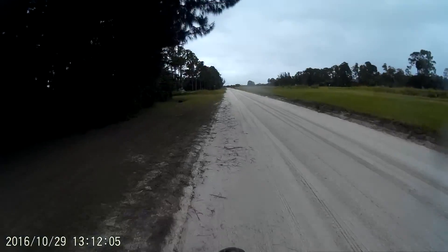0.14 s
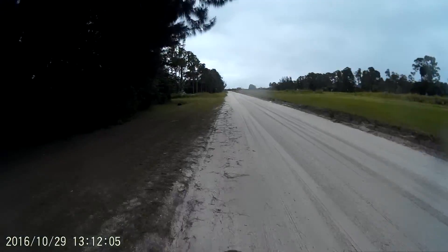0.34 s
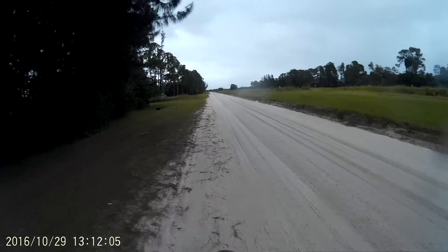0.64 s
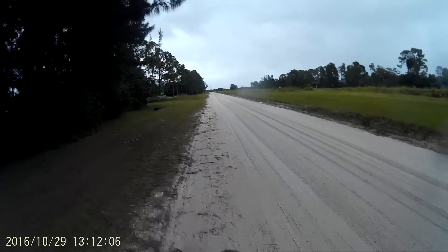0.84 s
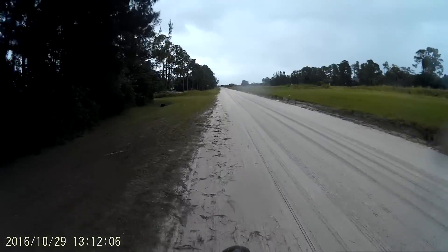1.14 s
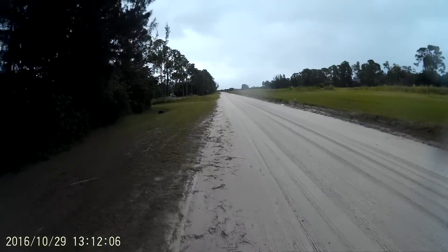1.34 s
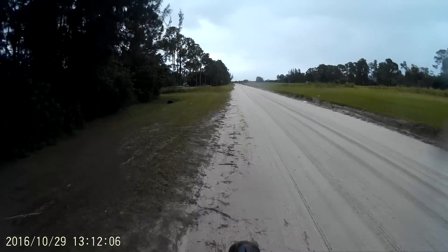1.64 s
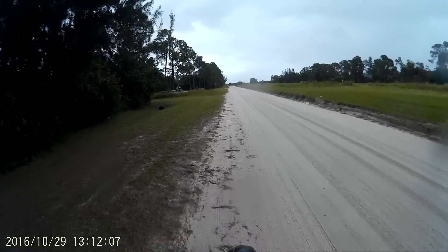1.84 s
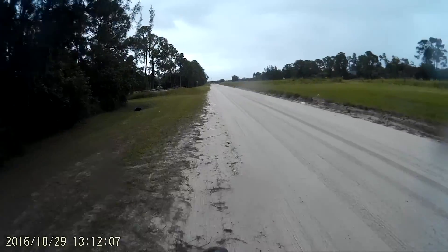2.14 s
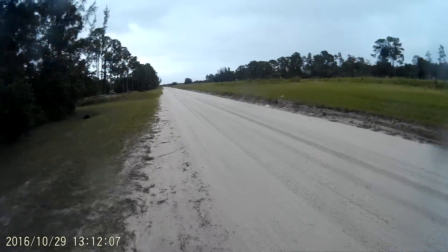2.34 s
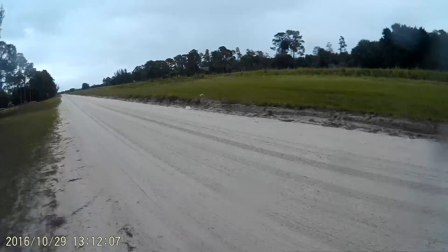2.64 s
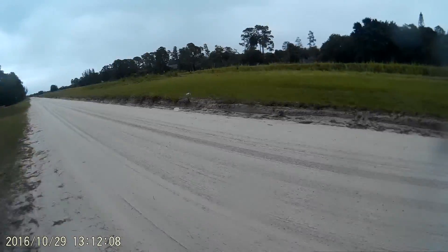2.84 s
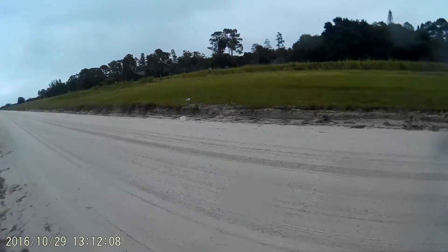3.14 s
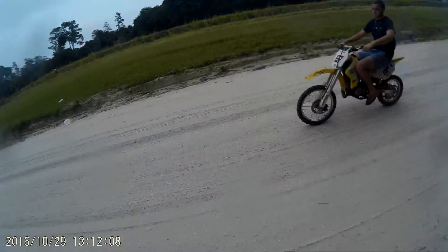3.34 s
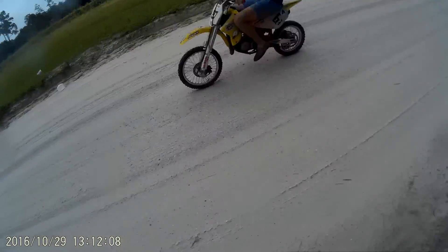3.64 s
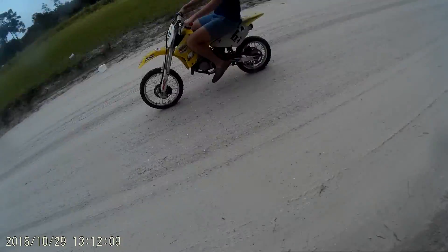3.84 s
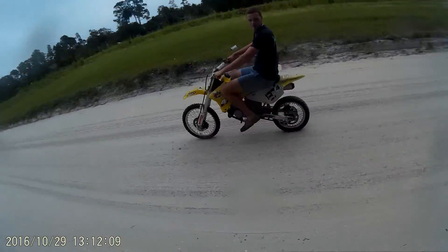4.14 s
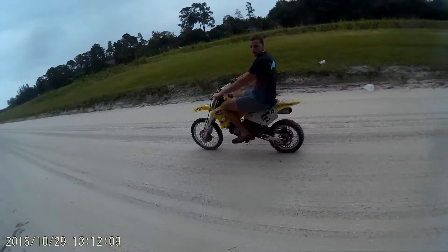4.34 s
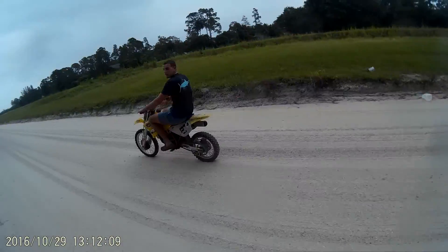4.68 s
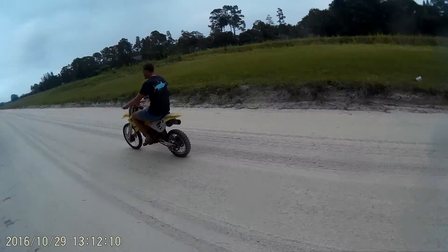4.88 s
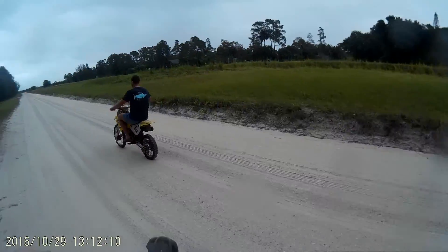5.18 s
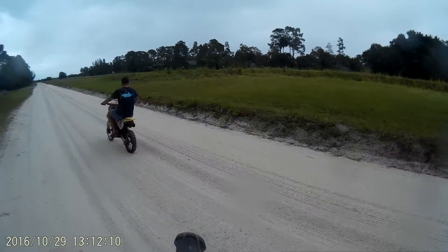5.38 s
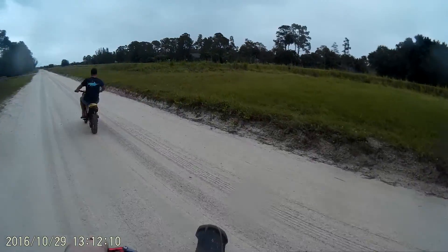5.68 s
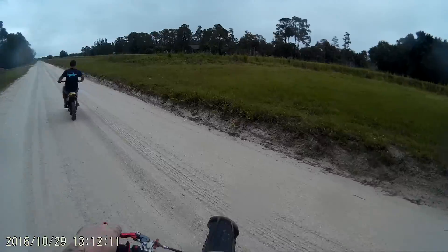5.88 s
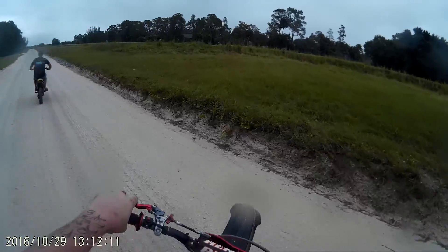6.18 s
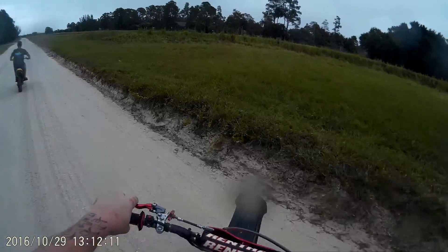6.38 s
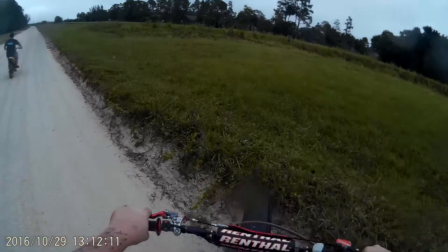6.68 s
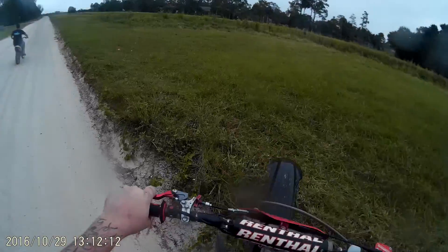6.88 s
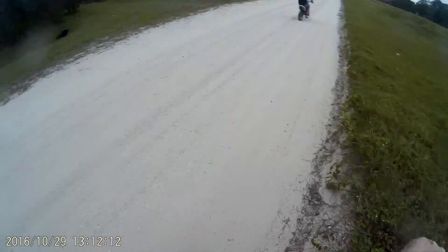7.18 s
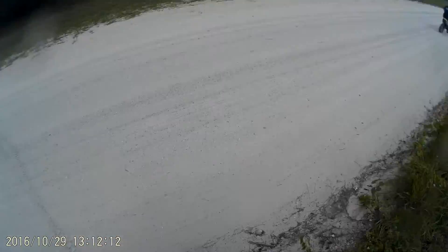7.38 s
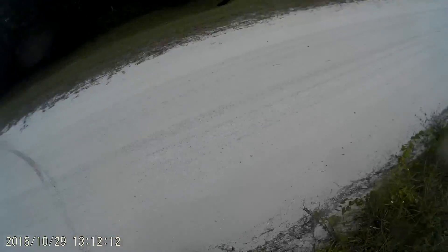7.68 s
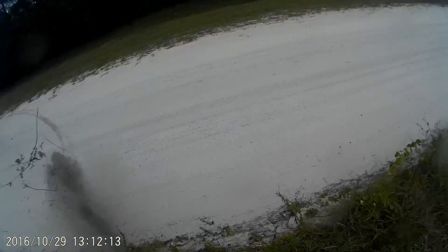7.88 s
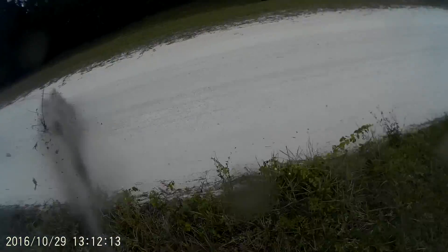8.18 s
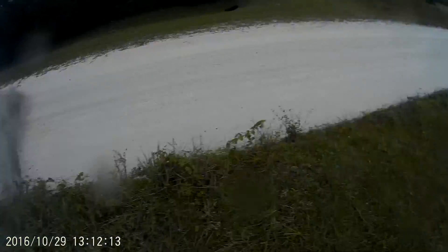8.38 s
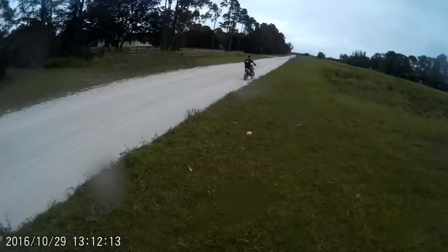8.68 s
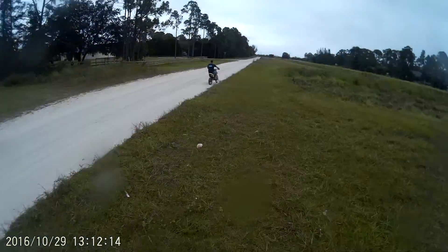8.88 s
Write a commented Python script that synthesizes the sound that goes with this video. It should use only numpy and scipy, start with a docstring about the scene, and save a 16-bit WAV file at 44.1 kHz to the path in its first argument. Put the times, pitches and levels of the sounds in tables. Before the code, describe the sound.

A two-stroke dirt bike coasts along a sandy track, heard from the rider's helmet. The engine throbs low, with metallic clatter, a ringing exhaust pipe and scattered sharp bangs. A smaller bike putters past and fades away. The bangs then come in quick runs as the throttle is blipped with a hollow honk, leading to one short, loud bark of full throttle, a brief coast and more revving.

```python
"""A sandy track, heard from the helmet of a rider on a two-stroke dirt bike. The engine coasts: the pipe
throbs, piston and chain clatter, the steel expansion chamber rings. Single firings bang in the pipe,
each resetting the crank's speed before it runs down again. A smaller bike putters past and away.
Throttle blips make the air box honk, and one burst of full throttle fires on every turn."""
import sys
import numpy as np
from scipy import signal
from scipy.fft import rfft, irfft
from scipy.io import wavfile
from scipy.ndimage import uniform_filter1d

SR = 44100
rng = np.random.default_rng(int(sys.argv[2]) if len(sys.argv) > 2 else 0)


def write(x):
    x = np.atleast_2d(x).T
    wavfile.write(sys.argv[1], SR, np.round(np.clip(x, -1, 1) * 32767).astype(np.int16))


N = 397782
TIME = np.arange(N) / SR
SIZE = 8192  # samples in a filter or wavetable
FREQ = np.arange(SIZE // 2 + 1) * SR / SIZE


def undb(db):
    """Decibels to gain."""
    return 10 ** (np.asarray(db) / 20)


def unit(x):
    """Scale to rms 1."""
    return x / np.sqrt(np.mean(x ** 2))


def lookup(x, table):
    """Read a two-column breakpoint curve at x."""
    return np.interp(x, *np.transpose(table))


def curves(table):
    """Each column after the time as an automation curve, one value per sample."""
    times, *columns = np.transpose(table)
    return [np.interp(TIME, times, column) for column in columns]


def gate(start, end, fade_s):
    """1 between start and end, 0 outside, with soft edges."""
    return np.clip(np.minimum(TIME - start, end - TIME) / fade_s + .5, 0, 1)


def noise():
    """White noise."""
    return rng.standard_normal(N)


def drift(rate_hz):
    """Smooth random drift of rms 1."""
    hold = int(SR / rate_hz)
    steps = np.repeat(rng.standard_normal(N // hold + 1), hold)
    return unit(uniform_filter1d(steps, hold)[:N])


def highpass(hz, order=4):
    """High-pass gain in dB."""
    return -10 * np.log10(1 + (hz / (FREQ + 10)) ** (2 * order))


def lowpass(hz, order=2):
    """Low-pass gain in dB."""
    return -10 * np.log10(1 + (FREQ / hz) ** (2 * order))


def eq(points):
    """Gain in dB through (f/Hz, level/dB) points, falling steeply below the first."""
    hz, db = np.transpose(points)
    return np.interp(np.log(FREQ + 1), np.log(hz), db) + highpass(hz[0] / 2)


def bells(modes):
    """Gain in dB of peaks and notches given as (f/Hz, width/Hz, gain/dB)."""
    return sum(db / (1 + (2 * (FREQ - hz) / width) ** 2) for hz, width, db in modes)


def ring(x, db):
    """Minimum-phase filter of this shape and unit power: peaks ring after each blow."""
    cepstrum = irfft(np.log(unit(undb(db)) + 1e-6))
    cepstrum[1:SIZE // 2] *= 2
    cepstrum[SIZE // 2 + 1:] = 0
    return signal.oaconvolve(x, irfft(np.exp(rfft(cepstrum))))[:N]


def scatter(x, spread_s, step_hz, lead=512):
    """Many paths through the machine: each frequency arrives with its own delay."""
    delay = np.interp(FREQ / step_hz, np.arange(SIZE), rng.random(SIZE) ** 2) * spread_s
    response = irfft(np.exp(-2j * np.pi * np.cumsum(delay) * SR / SIZE))
    return signal.oaconvolve(x, np.roll(response, lead)[:SIZE // 2])[lead:N + lead]


def clicks(times, sizes):
    """Impulses placed between samples by a short windowed sinc."""
    at = np.asarray(times)[:, None] * SR
    index = at.astype(int) + np.arange(-7, 9)
    taps = np.sinc(index - at) * np.sinc((index - at) / 8) * np.asarray(sizes)[:, None]
    return np.bincount(np.clip(index, 0, N).ravel(), taps.ravel(), N + 1)[:N]


def puffs(times, sizes, decay_s, tail_db, tail_s):
    """A noise burst with a weaker tail at each time; a size of 1 has unit energy."""
    t = TIME[:SR // 3]
    decay = np.exp(-2 * t / decay_s) + undb(2 * tail_db) * np.exp(-2 * t / tail_s)
    triggers = clicks(np.round(times * SR) / SR, sizes ** 2)
    power = signal.fftconvolve(triggers, decay / decay.sum())[:N]
    return noise() * np.sqrt(np.abs(power))


def strokes(turns, jitter_s, spread_db):
    """Time and size of one blow per turn; sizes keep the mean power near 1."""
    times = np.interp(np.arange(1, int(turns[-1])), turns, TIME)
    chance = rng.standard_normal((1000, 2))[:len(times)]
    sizes = np.sqrt(np.gradient(times) * SR) * undb(spread_db * chance[:, 1])
    return times + jitter_s * chance[:, 0], sizes


def by_speed(hz, cruise_db, db_per_octave, cruise_hz=45):
    """Level in dB of a part that grows louder with crank speed."""
    return cruise_db + db_per_octave * np.log2(hz / cruise_hz)


# the throb peaks near the pipe's lowest resonance: crank f/Hz, level/dB
THROB_LEVEL = [(32, -43.5), (43, -37.5), (55, -30), (70, -27.5), (82, -30), (100, -36), (120, -34)]
# fader rides as the helmet moves about the bike: t/s, throb gain/dB, chamber gain/dB
HELMET_RIDES = [(0, -1, -6), (.35, -7, 1.5), (.6, -6, -17), (1.1, -1, -4), (2.3, -3.5, -4.5),
                (3.15, 3.5, 5), (3.85, -3, 3.5), (4.15, 6, 9), (4.8, 1, -6), (5.3, 0, 3), (6.1, -1, 3.5),
                (6.48, 3.5, 1.5), (6.68, -8, -3.5), (7.35, -4.5, 4.5), (7.95, -9.5, 0), (8.25, 2, -5),
                (8.7, -6, -9), (9, 1, 6.5)]


def throb(turns, hz):
    """Air pumped once a turn: an almost pure low tone over a little rumble."""
    tone = np.sqrt(2) * np.sin(2 * np.pi * turns)
    rumble_eq = eq([(20, -2), (60, -2), (110, -10.5), (190, -2.5), (300, -7), (900, -11.5), (3000, -39)])
    rumble = ring(noise(), rumble_eq)
    tone_db = lookup(hz, THROB_LEVEL) + curves(HELMET_RIDES)[0]
    return tone * undb(tone_db + .35 * drift(20)) + rumble * undb(-44 + 1.1 * drift(2.5))


# gear whine: multiple of the crank rate, relative level/dB
GEAR_WHINE = [(7, -11.5), (12, -23), (13, -17.5), (14, -17.5), (16, -12), (19, -16)]


def churn(turns, count=64):
    """The same uneven rubbing and knocking comes round on every turn, with the gears whining in it."""
    harmonics = np.exp(2j * np.pi * rng.random(count)) * undb(3 * rng.standard_normal(count))
    harmonics[:3] = 0
    one_turn = unit(irfft(harmonics, SIZE))
    index = np.arange(SIZE)
    whine = sum(undb(db) * np.sin(2 * np.pi * multiple * index / SIZE) for multiple, db in GEAR_WHINE)
    return np.interp(turns % 1 * SIZE, index, one_turn + whine)


# metallic colour of pipe, cases and fins: f/Hz, width/Hz, gain/dB
METAL_MODES = [(271, 95, 9), (468, 63, 6.5), (649, 45, 2.5), (768.4, 42, 6.5), (1148.6, 69, 8),
               (1347, 103, -8), (1540, 91, 6), (2082, 290, 6.5), (2290, 132, -11), (2730, 72, 7),
               (3160, 570, 10.5), (3610, 74, -16), (3853, 53, 17.5), (4210, 1080, -17.5), (4825, 71, 14),
               (6270, 78, -1), (9060, 1000, -9.5), (10270, 640, 5), (11550, 420, 5), (12800, 1400, -6)]
# tone of the clatter: f/Hz, level/dB
CLATTER_EQ = [(59, -42), (100, -0.5), (325, -8), (419, -2), (577, -7.5), (768, -3), (1010, -7), (1140, -2),
              (1380, -5), (3170, -14.5), (4500, -36), (5850, -33), (9900, -120)]
# loose rattle in the clatter: crank f/Hz, share/0-1
RATTLE_SHARE = [(33, 0.59), (55, 0.41)]


def clatter(turns, hz, times, sizes):
    """Unfired turns make a gliding drone; piston and chain rattle in it, most of all near idle."""
    colour = eq(CLATTER_EQ) + 1.19 * bells(METAL_MODES) + highpass(162, order=3)
    # harmonics swell as they slide through the silencer's resonances
    silencer = bells([(310, 140, -2), (432, 24, 5.5), (949, 136, 4.5)])
    drone = unit(ring(churn(turns), colour + silencer))
    knocks = puffs(times, sizes, decay_s=.008, tail_db=-5, tail_s=.045)
    rattle = ring(knocks, colour + highpass(700, order=1))
    looseness = lookup(hz, RATTLE_SHARE)
    return np.sqrt(1 - looseness ** 2) * drone + looseness * rattle


# bright tone of rasp and gas hiss: f/Hz, level/dB
RASP_EQ = [(2800, -11), (4200, 6.5), (5000, 0.5), (7000, -3), (8800, -7), (10500, -4.5), (11900, -9),
           (12800, -17), (16000, -34)]
# thin cooling fins: f/Hz, width/Hz, gain/dB
FIN_MODES = [(2820, 130, 12), (3150, 180, 8), (5090, 180, 9), (6100, 220, 5)]


def rasp(times, sizes):
    """A bright scrape on each turn sets the cooling fins ringing."""
    scrapes = puffs(times, sizes, decay_s=.0024, tail_db=-7, tail_s=.059)
    return ring(scrapes, eq(RASP_EQ) + .27 * bells(METAL_MODES) + bells(FIN_MODES))


# the clutch bites, loading the crank and shaking the chain:
# start t/s, end t/s, drag/(Hz per s), clatter level/dB, rasp level/dB (both before the mix trims)
CLUTCH_BITES = [(0, 1.57, -0.5, -35, -47.5), (3.15, 3.9, 5, -41, -55), (4.25, 5.1, 10, -46, -61),
                (5.66, 5.78, 57, -31.5, -44.5), (6.3, 6.68, 6.5, -36.5, -55.5), (6.85, 7.35, 0, -32, -38),
                (8.55, 8.6, 35, -32, -44)]
CLUTCH_FADE_S = .1


def coasting(turns, hz):
    """Clatter and rasp rise with crank speed up to a cap, and swell when the clutch bites."""
    times, sizes = strokes(turns, jitter_s=.002, spread_db=2)
    clatter_gain = undb(np.minimum(by_speed(hz, cruise_db=-36, db_per_octave=14.5), -29))
    rasp_gain = undb(np.minimum(by_speed(hz, cruise_db=-52, db_per_octave=13.8), -42))
    for start, end, _, clatter_db, rasp_db in CLUTCH_BITES:
        engaged = gate(start, end, CLUTCH_FADE_S)
        clatter_gain = np.hypot(clatter_gain, engaged * undb(clatter_db))
        rasp_gain = np.hypot(rasp_gain, engaged * undb(rasp_db))
    body = undb(-1) * clatter_gain * clatter(turns, hz, times, sizes)
    return body + undb(-5) * rasp_gain * rasp(times, sizes)


def chamber(turns, hz):
    """Each turn shakes the thin steel of the expansion chamber, which rings on until the next."""
    steel = bells([(1170, 137, 21.5)]) + highpass(770) + lowpass(1460, order=4)
    shaking = .8 * unit(ring(churn(turns), steel)) + .6 * ring(noise(), steel)
    tremolo = 1 + .22 * np.cos(2 * np.pi * turns)
    level_db = by_speed(hz, cruise_db=-41.5, db_per_octave=12) + curves(HELMET_RIDES)[1]
    return shaking * tremolo * undb(level_db)


# single firings: t/s, relative bang level/dB, relative hiss level/dB, f/Hz the crank is left at
FIRING_CUES = [(0.126, -12, -26.5, 49.1), (0.277, -11, -22.5, 50.35), (1.992, -28, -43, 33),
               (2.104, -24.5, -48, 35.26), (2.695, -17.5, -32, 39.75), (3.009, -19, -38, 41.5),
               (3.058, -14, -28.5, 46.1), (3.65, -27, -56, 34.8), (3.707, -15, -44, 35),
               (3.793, -18.5, -56, 34.4), (3.852, -30, -60, 35.5), (3.907, -13.5, -40, 36.8),
               (4.014, -13.5, -29, 40.6), (4.06, -11, -26.5, 46), (4.126, -26.5, -50, 47.1),
               (4.169, -15.5, -40, 48.47), (4.882, -16, -30.5, 40), (4.928, -11.5, -26.5, 46.6),
               (5.192, -10, -25, 53.7), (5.232, -10, -23.5, 60.3), (5.298, -11.5, -25.5, 63.7),
               (5.399, -14, -34, 59.4), (5.449, -21, -41, 58), (5.489, -14.5, -31.5, 58.4),
               (5.546, -8.5, -22.5, 58.6), (5.597, -9, -22.5, 57.5), (5.651, -9.5, -22.5, 58.2),
               (5.772, -13, -26.5, 44.4), (5.824, -12, -25, 43), (5.873, -11.5, -24, 43),
               (5.922, -11, -24.5, 43), (5.97, -11, -24, 44.3), (6.017, -10, -23, 42.7),
               (6.068, -11.5, -25, 45), (6.117, -11.5, -24, 44), (6.165, -11.5, -26.5, 40.8),
               (6.219, -12, -26, 43.5), (6.266, -11.5, -23, 48.7), (6.31, -10, -23.5, 50.8),
               (6.348, -11, -24, 52.8), (6.407, -11, -23.5, 52.4), (6.704, -11, -26, 52.2),
               (6.761, -9.5, -18.5, 60.7), (6.778, -11.5, -23, 62.6), (6.826, -9, -20, 67.5),
               (7.183, -9.5, -27, 58.7), (7.202, -9.5, -24, 63.5), (7.233, -10, -25, 73.2),
               (7.246, -12, -25, 76.8), (7.874, -7, -23, 70.2), (8.237, -13.5, -30, 61.7),
               (8.387, -11, -25.5, 60.4), (8.584, -10.5, -23, 56.7), (8.601, -9, -25, 66.6),
               (8.645, -10.5, -25, 66), (8.676, -11.5, -24, 66.4), (8.737, -11.5, -26, 64.5),
               (8.754, -12.5, -26, 63), (8.803, -7.5, -24, 61), (8.821, -11.5, -23, 62),
               (8.872, -8.5, -20.5, 56), (8.89, -12, -23, 57), (8.945, -10, -24, 52.2),
               (8.986, -12.5, -22, 49.7)]
# tone of the bang: f/Hz, level/dB
BANG_EQ = [(88, -45.5), (150, -2.5), (300, -3.5), (386, -14), (468, -2.5), (601, -11), (1160, -4.5),
           (2060, -10), (2310, -15), (2810, -9), (4120, -18), (10400, -26.5), (15000, -71)]
# a turned head hears the tailpipe directly: t/s, crack gain/dB added to the bang's cue level
CRACK_RIDE = [(2, -23), (2.7, -11), (3.2, -24), (3.7, -6), (4.1, 0.5), (4.8, -29), (7.2, -5.5), (7.9, 1.5),
              (8.4, 3.5), (8.6, -4)]
# tone of the tailpipe's crack: f/Hz, level/dB
CRACK_EQ = [(500, -1), (1300, 5.5), (2200, 3.5), (4500, -6.5), (11000, -5.5), (15000, -29)]
# tailpipe resonances: f/Hz, width/Hz, gain/dB
TAILPIPE_MODES = [(1960, 300, 11.5), (2930, 400, 2), (3850, 600, -2)]


def firings():
    """Each lone firing bangs in the pipe, cracks at the tailpipe and blows out a hiss of gas."""
    times, bang_db, hiss_db, _ = np.transpose(FIRING_CUES)
    pipe_modes = bells([(504, 69, 2.6), (836, 72, 9.3), (2700, 76, 1)])
    colour = eq(BANG_EQ) + .95 * bells(METAL_MODES) + pipe_modes + highpass(287, order=3)
    blast = scatter(clicks(times + .001957, undb(bang_db)), spread_s=.014, step_hz=161)
    gas = puffs(times, undb(bang_db), decay_s=.015, tail_db=-10, tail_s=.049)
    bang = .88 * ring(blast, colour + lowpass(3000)) + .68 * ring(gas, colour + highpass(700, order=1))
    direct_db = bang_db + lookup(times, CRACK_RIDE)
    snap = puffs(times + .001, undb(direct_db + 15.5), decay_s=.002, tail_db=-13, tail_s=.008)
    crack = ring(snap, eq(CRACK_EQ) + bells(TAILPIPE_MODES))
    fresh_gas = puffs(times, undb(hiss_db + 21.5), decay_s=.015, tail_db=-53, tail_s=.014)
    hiss = ring(fresh_gas, eq(RASP_EQ) + .75 * bells(METAL_MODES))
    return undb(16.5) * bang + crack + hiss


# fader ride of the small bike's pass-by: t/s, relative level/dB
PASS_BY_RIDE = [(2.6, -67), (3.2, -47), (3.5, -31), (3.9, -28), (4.3, -43), (4.8, -66.5), (6, -60),
                (9, -64)]
# its loudest firings: t/s, relative level/dB
PASS_BY_POPS = [(3.334, -24.5), (3.3694, -29), (3.3955, -31.5), (3.4337, -35), (3.4734, -25),
                (3.5123, -25.5), (3.5438, -31), (3.586, -27.5), (3.5942, -23), (3.6277, -26.5),
                (4.2202, -23), (4.3894, -25), (4.588, -25.5), (4.8268, -39)]
# tone of its exhaust: f/Hz, level/dB
PUTTER_EQ = [(120, -30), (280, 5), (430, 15.5), (620, -21), (1150, 0), (1600, 2), (3000, -15), (4200, -18),
             (5500, -15), (7800, -31), (11000, -24), (15000, -28)]


def small_bike(crank_hz=26):
    """A small engine putters by, one puff a turn; some of its dry firings stand out."""
    turns = np.cumsum(crank_hz * (1 + .065 * drift(3.7))) / SR
    times, sizes = strokes(turns, jitter_s=.0006, spread_db=1.5)
    putter = puffs(times, sizes, decay_s=.0078, tail_db=-26, tail_s=.03)
    putter *= undb(lookup(TIME, PASS_BY_RIDE) - 7)
    pop_times, pop_db = np.transpose(PASS_BY_POPS)
    gas = puffs(pop_times, undb(pop_db), decay_s=.006, tail_db=-22, tail_s=.02)
    pops = clicks(pop_times, undb(pop_db)) + .7 * gas
    silencer = bells([(436, 84, 5.5), (620, 180, -8), (1560, 130, 9.5), (3180, 640, 20)])
    return ring(putter + undb(17) * pops, eq(PUTTER_EQ) + silencer + lowpass(12100, order=8))


# the throttle is cracked open: start t/s, end t/s, honk level/dB
THROTTLE_BLIPS = [(5.147, 5.286, -34), (5.5, 5.633, -32.5), (5.763, 6.384, -34), (6.715, 6.816, -28.5),
                  (7.17, 7.25, -28.5), (7.344, 7.404, -24), (8.553, 9.1, -30)]


def intake(turns):
    """With the throttle open, each gulp of air rings the air box: a honk near 290 Hz."""
    times, sizes = strokes(turns, jitter_s=.0003, spread_db=1.2)
    air_box = bells([(290.5, 96, 17)]) + highpass(188) + lowpass(470, order=3)
    throttle = sum(undb(db) * gate(start, end, fade_s=.038) for start, end, db in THROTTLE_BLIPS)
    return ring(clicks(times, sizes), air_box) * throttle


# fader rides of the full-throttle burst: t/s, boom level/dB, bark level/dB (both relative)
BURST_RIDES = [(7.33, -34, -36), (7.37, -14, -7.5), (7.44, -14.5, -11.5), (7.502, -13.5, -11.5),
               (7.748, -18, -11.5), (7.848, -17, -8.5), (7.86, -23, -17), (7.9, -40, -30)]
# tone of boom and bark: f/Hz, level/dB
BARK_EQ = [(59, -47), (100, -24), (159, -50), (201, -10), (300, -12), (487, -8.5), (614, -17), (727, -9.5),
           (1370, -7), (2090, -6), (2320, -11), (3050, -11), (4100, -20.5), (10400, -26.5), (15500, -58)]
# what the hot pipe adds under load: f/Hz, width/Hz, gain/dB
HOT_PIPE_MODES = [(120, 83, 2), (317, 94, 11.5), (652, 65, -2), (1026, 170, 6), (1680, 720, -2),
                  (2130, 400, 6), (2300, 120, -2)]
# the boom fades in and out with the throttle: t/s, share/0-1
BOOM_FADE = [(7.36, 0), (7.425, 1), (7.865, 1), (7.89, 0)]
# how much of the charge burns: t/s, share/0-1
BURN_SHARE = [(7.35, 0), (7.373, .5), (7.43, 1), (7.848, 1), (7.87, 0)]


def full_throttle(turns):
    """The engine fires on every turn: a clean boom from the pipe and a hard, gassy bark."""
    boom_db, bark_db = curves(BURST_RIDES)
    times, sizes = strokes(turns, jitter_s=.00006, spread_db=.8)
    colour = eq(BARK_EQ) + 1.08 * bells(METAL_MODES) + bells(HOT_PIPE_MODES)
    push = sizes * lookup(times, BOOM_FADE) * undb(np.interp(times, TIME, boom_db))
    pulses = scatter(clicks(times, push), spread_s=.00565, step_hz=307)
    boom = ring(pulses, colour + lowpass(1180))
    burn_db = np.interp(times, TIME, bark_db) + rng.standard_normal(len(times))
    burn = sizes * lookup(times, BURN_SHARE) * undb(burn_db)
    gas = puffs(times, burn, decay_s=.003, tail_db=-6, tail_s=.014)
    blast = scatter(clicks(times, burn), spread_s=.002974, step_hz=520)
    bark = .75 * ring(blast, colour + highpass(1400, order=3) + lowpass(3500))
    bark += .72 * ring(gas, colour + highpass(1100, order=3))
    hiss = ring(gas, eq(RASP_EQ) + .64 * bells(METAL_MODES))
    return boom + undb(-3.5) * bark + undb(-15.5) * hiss


# crank speed at full throttle, dipping as the tyre grips: t/s, f/Hz
REV_CURVE = [(7.36, 73.27), (7.41, 103), (7.49, 121.3), (7.54, 119), (7.61, 99.73), (7.69, 96.4),
             (7.77, 108.3), (7.86, 105.7), (7.91, 76.1), (7.94, 67.6)]


def crank_speed(start_hz=43.44, idle_hz=31.3, run_down_s=.6, kick_s=.0445):
    """Each firing kicks the crank to its cued speed; friction and the clutch run it down."""
    drag = sum(hz_per_s * gate(start, end, CLUTCH_FADE_S) for start, end, hz_per_s, _, _ in CLUTCH_BITES)
    unfired_hz = idle_hz - signal.lfilter([1 / SR], [1, -np.exp(-1 / (run_down_s * SR))], drag)
    times, _, _, kicked_hz = np.transpose(FIRING_CUES)
    times, kicked_hz = np.r_[0, times], np.r_[start_hz, kicked_hz]
    latest = np.searchsorted(times, TIME, side="right") - 1
    surplus_hz = kicked_hz - np.interp(times, TIME, unfired_hz)
    hz = unfired_hz + surplus_hz[latest] * np.exp((times[latest] - TIME) / run_down_s)
    hz = uniform_filter1d(hz, int(kick_s * SR))
    revving = (TIME > REV_CURVE[0][0]) & (TIME < REV_CURVE[-1][0])
    return np.where(revving, lookup(TIME, REV_CURVE), hz)


def crank_turns(hz, wobble=.003):
    """Turns counted from the start, nudged so that every lone firing falls on a whole turn."""
    turns = np.cumsum(hz * (1 + wobble * drift(20))) / SR
    times = np.transpose(FIRING_CUES)[0]
    nudge = np.unwrap(-np.interp(times, TIME, turns) % 1, period=1)
    return turns + np.interp(TIME, times, nudge)


def scene():
    """Mono mix: the rider's bike, its layers locked to one crank, and the small bike passing."""
    hz = crank_speed()
    turns = crank_turns(hz)
    bed = throb(turns, hz) + coasting(turns, hz) + chamber(turns, hz)
    accents = intake(turns) + firings() + full_throttle(turns)
    return (bed + accents + small_bike())[None]


def record(dry, ceiling=.74, top_hz=15900):
    """Soft-clip the highest peaks and cut the top of the treble."""
    rounded = dry / (1 + (dry / ceiling) ** 4) ** (1 / 4)
    return signal.sosfilt(signal.ellip(8, .2, 70, top_hz, fs=SR, output="sos"), rounded)


dry = scene()
out = record(dry)
write(out)
```